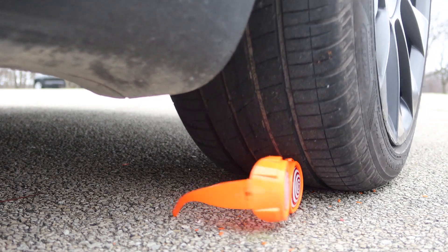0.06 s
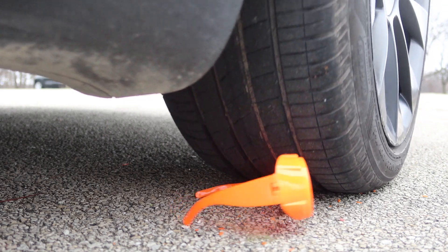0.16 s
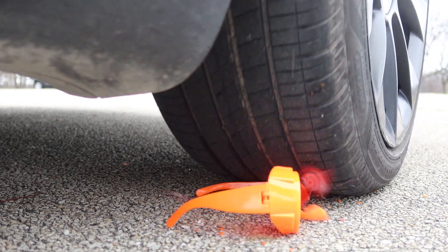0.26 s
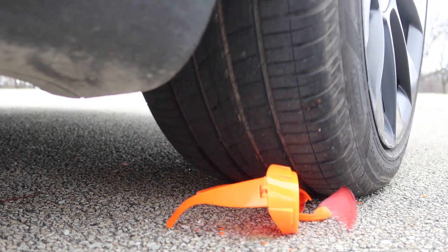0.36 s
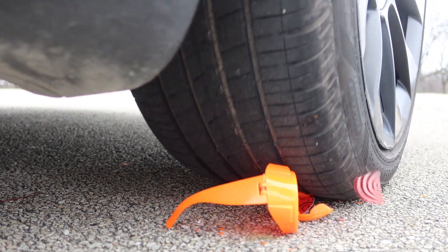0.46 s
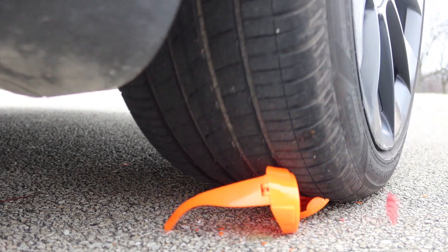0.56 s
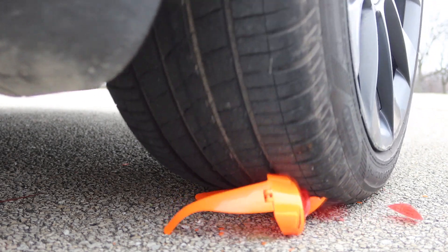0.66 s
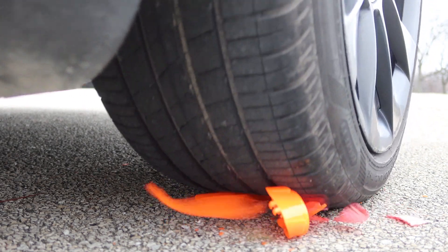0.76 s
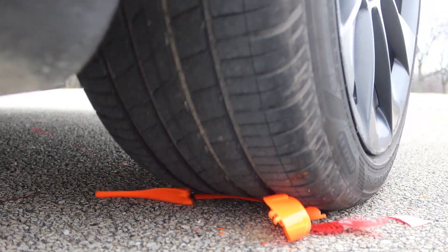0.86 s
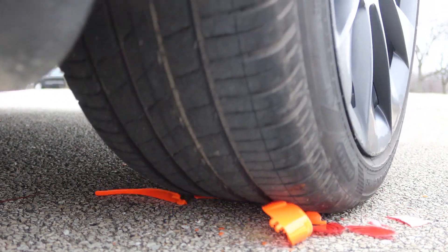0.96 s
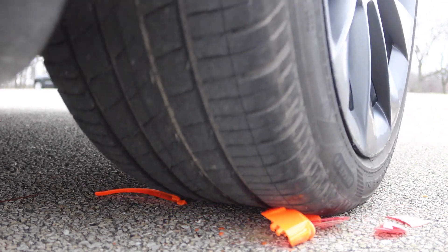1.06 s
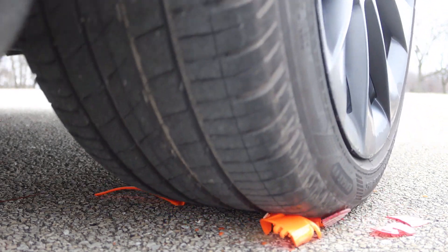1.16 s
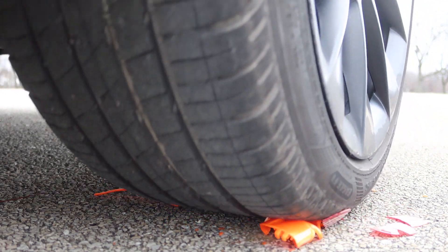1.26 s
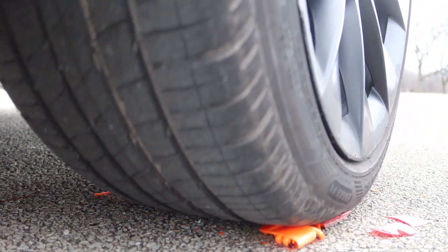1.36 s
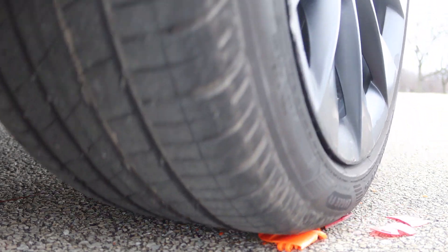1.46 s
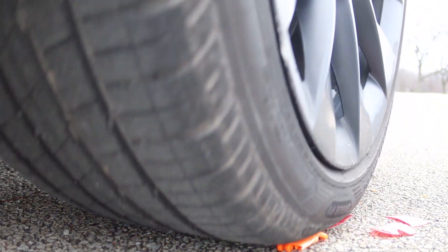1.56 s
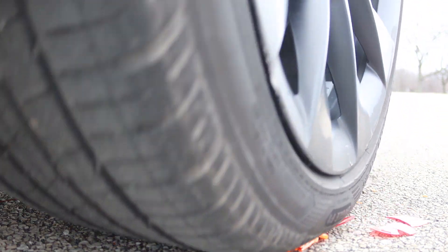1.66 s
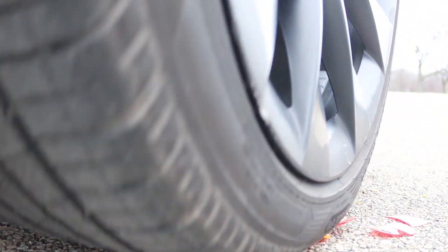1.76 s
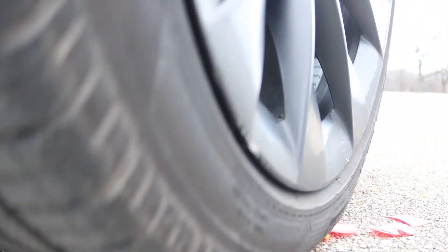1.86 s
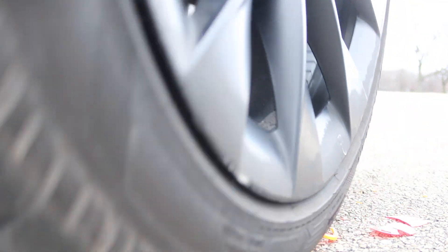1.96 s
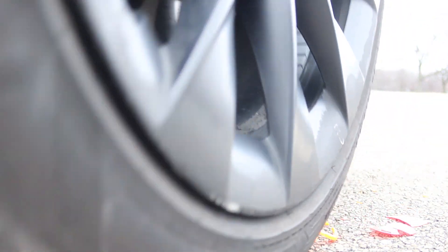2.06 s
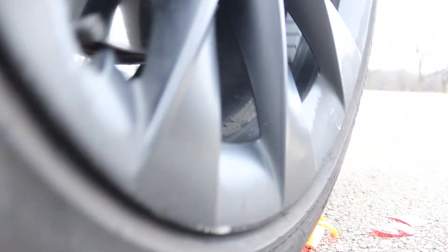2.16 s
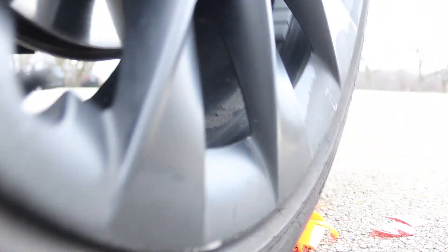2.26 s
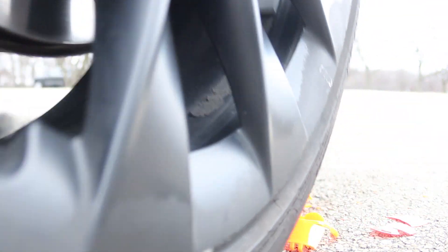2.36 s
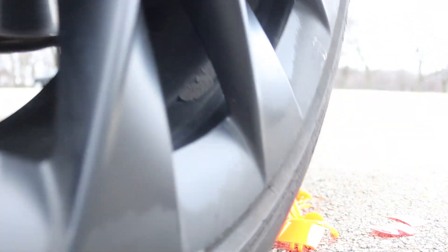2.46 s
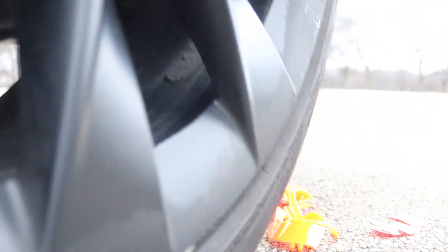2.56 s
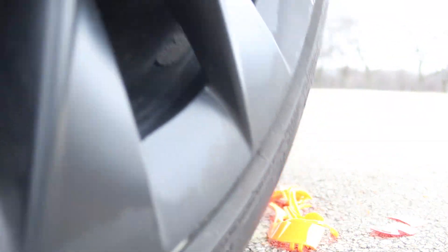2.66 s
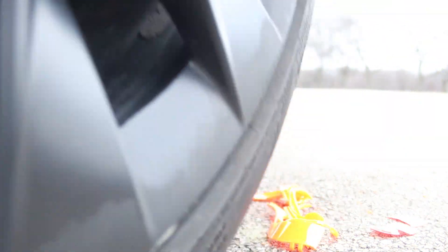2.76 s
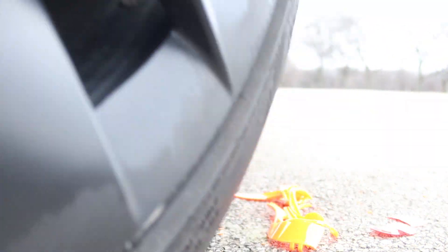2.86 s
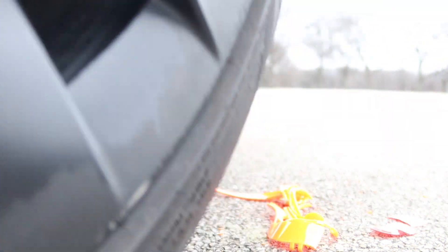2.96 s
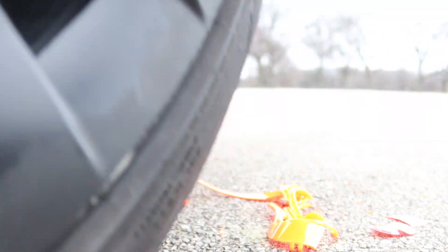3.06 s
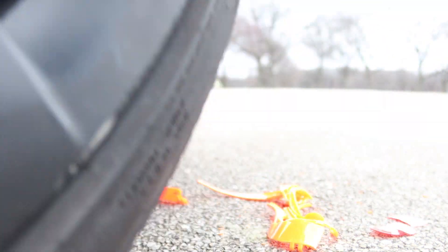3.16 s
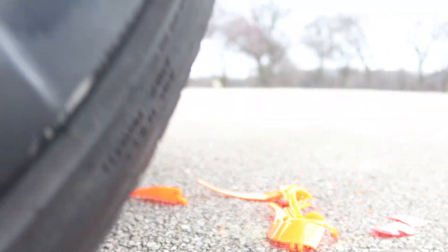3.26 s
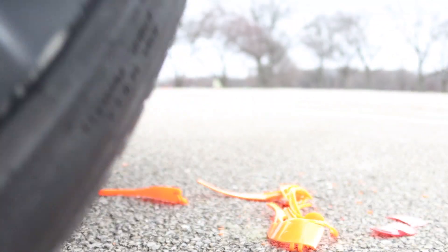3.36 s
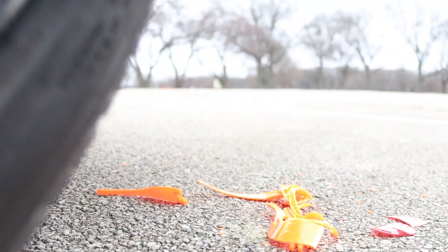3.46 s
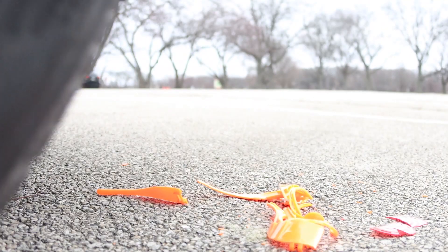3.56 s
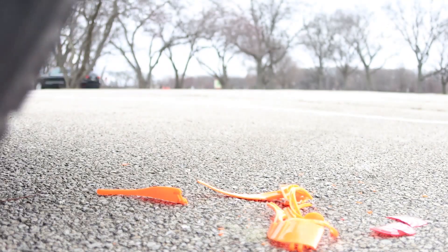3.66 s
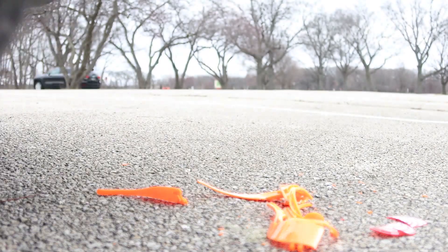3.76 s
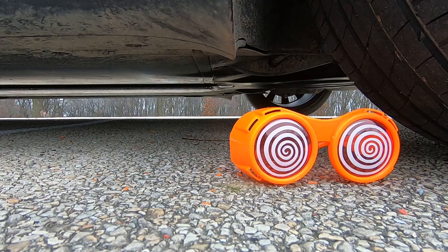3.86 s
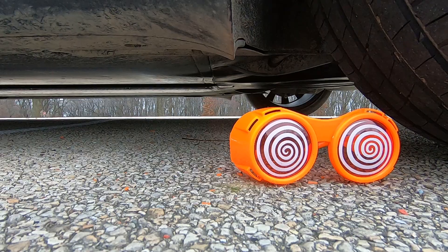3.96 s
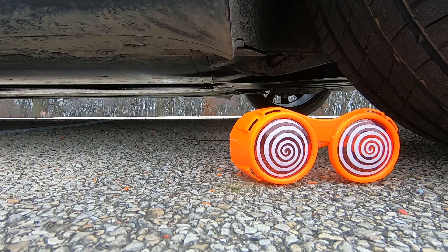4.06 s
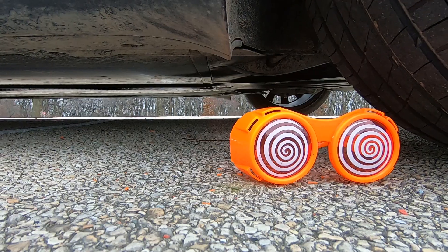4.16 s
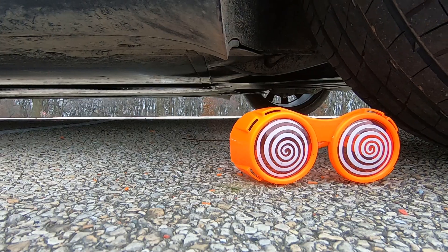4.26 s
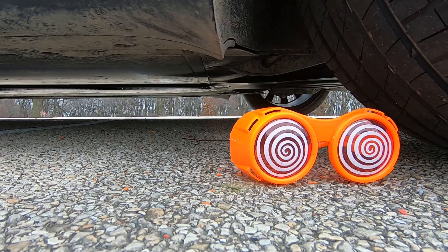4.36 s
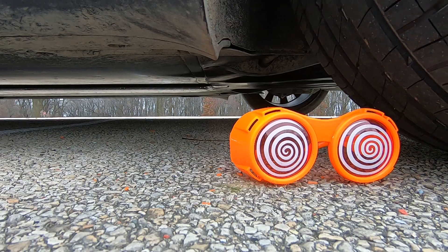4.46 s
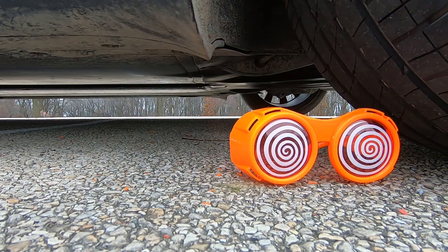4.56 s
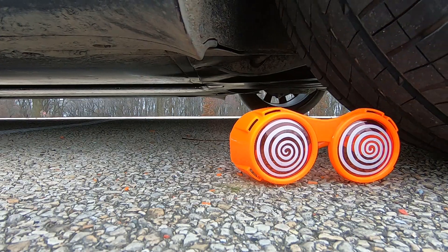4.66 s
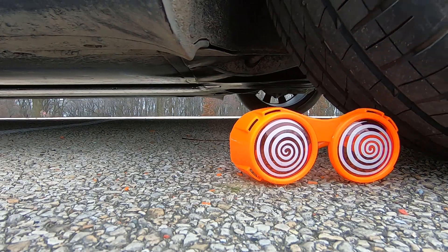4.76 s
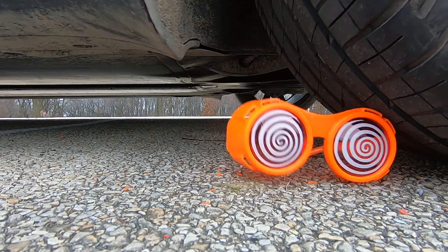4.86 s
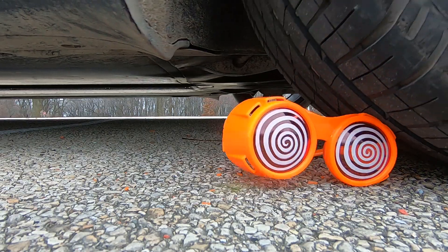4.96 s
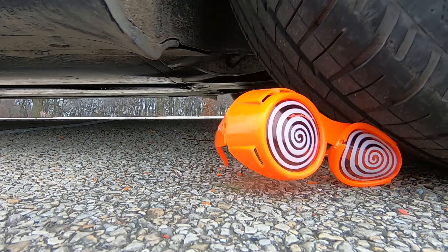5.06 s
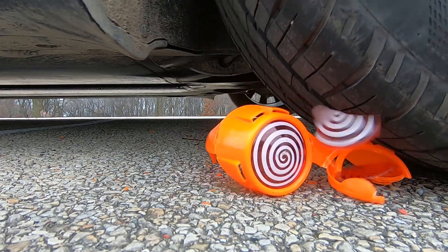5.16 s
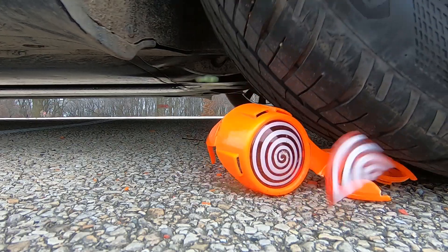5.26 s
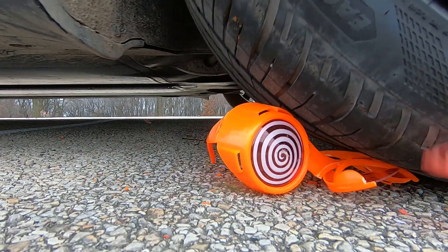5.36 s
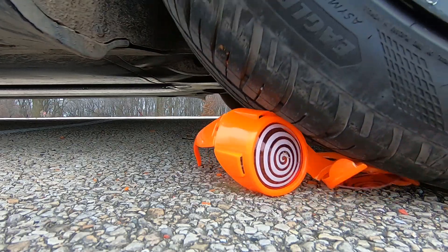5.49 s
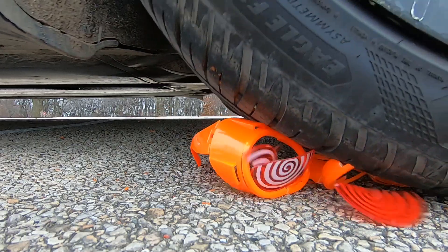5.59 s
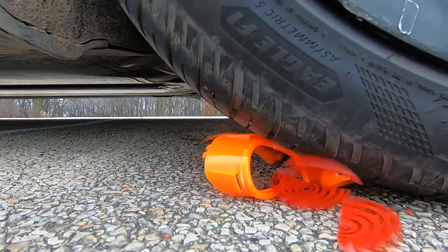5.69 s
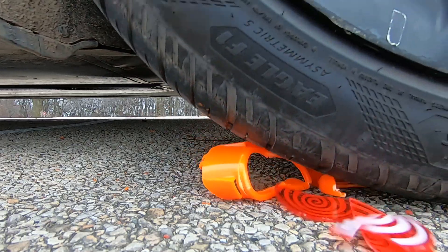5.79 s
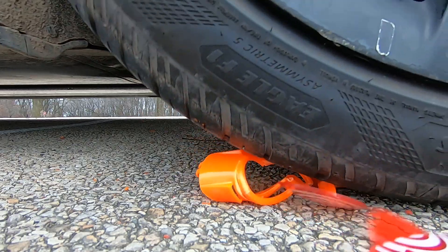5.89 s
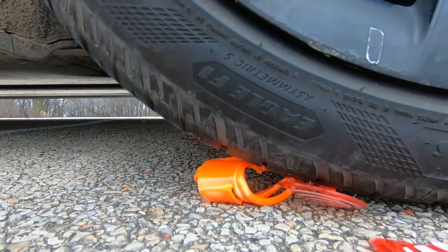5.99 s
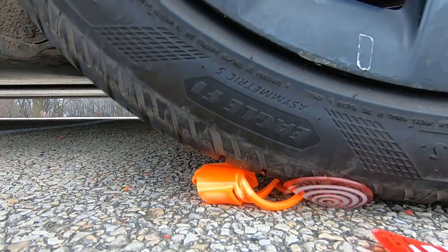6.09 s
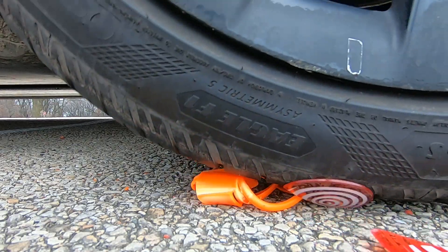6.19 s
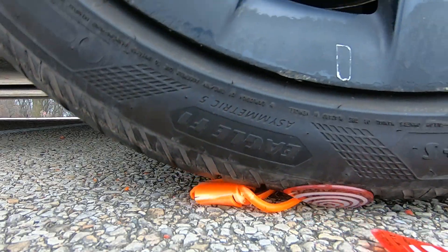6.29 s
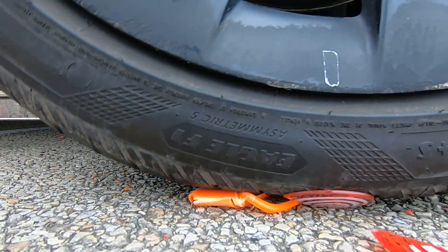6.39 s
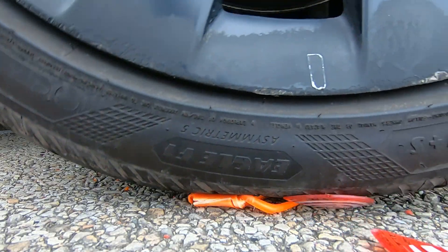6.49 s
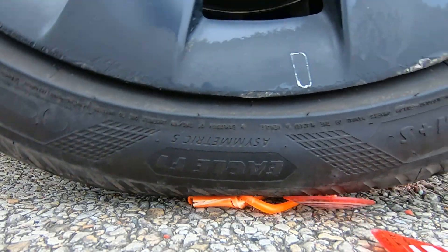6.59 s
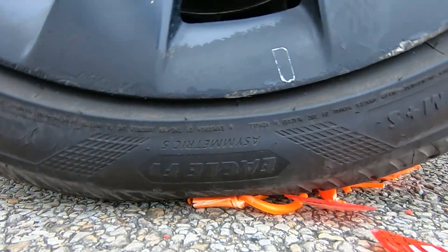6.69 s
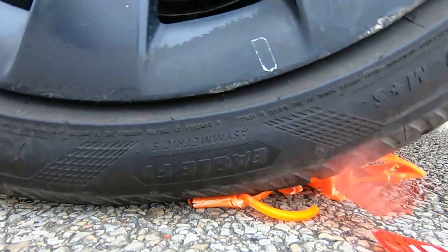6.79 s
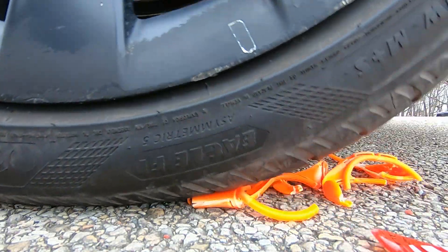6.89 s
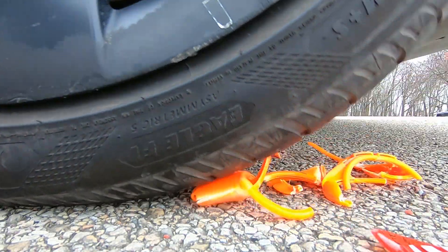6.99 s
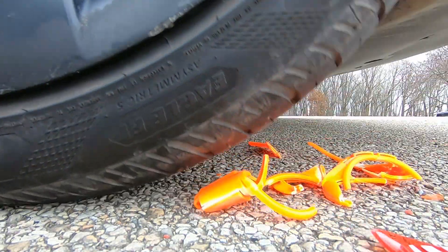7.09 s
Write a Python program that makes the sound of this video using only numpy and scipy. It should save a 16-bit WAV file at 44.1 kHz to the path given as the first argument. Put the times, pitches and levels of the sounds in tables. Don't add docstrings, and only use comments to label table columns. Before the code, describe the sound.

A slow car tyre crushes hard plastic goggles on asphalt with sharp brittle cracks, then the same crush repeats duller and lower from the ground.

```python
import sys
import numpy as np
from scipy import signal
from scipy.fft import rfft, irfft, next_fast_len
from scipy.io import wavfile
from scipy.ndimage import uniform_filter1d

SR = 44100
rng = np.random.default_rng(int(sys.argv[2]) if len(sys.argv) > 2 else 0)


def put_to_file(sound):
    columns = np.atleast_2d(sound).T
    safe = np.clip(columns, -1, 1)
    whole_steps = np.round(safe * 32767)
    wavfile.write(sys.argv[1], SR, whole_steps.astype(np.int16))


def invert_db(x):
    u = np.asarray(x, float) / 20
    return 10 ** u


N = 314433

CUT_S, REPLAY_S = 3.862, 4.8468
LOADED_S = 1.36

# [start_s, shard_db, pitch_hz, treble_db]
FRAME_BREAKS = [(0.164, -4.5, 3300, -19.5), (0.1683, 5, 3400, -4), (0.173, 2, 3220, -4.5),
                (0.199, 1, 3150, -14.5), (0.2192, 1.5, 3200, -6), (0.242, -0.5, 3300, -13),
                (0.2619, 5, 3660, -4.5), (0.2711, -8.5, 1466, -8), (0.2783, -10, 7550, -12),
                (0.3055, -13.5, 3430, -13), (0.3215, -3.5, 4236, -4), (0.334, -5.5, 3600, -4),
                (0.354, 8.5, 3460, 0.5), (0.4664, -5.5, 7900, -3.5), (0.4688, -4.5, 5500, -11.5),
                (0.473, 0, 3200, -6), (0.4805, 1, 5630, -9.5), (0.4928, -7.5, 3300, -1),
                (0.5517, -8, 2940, -15), (0.6127, 7, 3540, -17), (0.6396, -1, 3300, -18.5),
                (0.6525, -2.5, 2400, -19.5), (0.6692, 4.5, 3200, -10.5), (0.6758, -2.5, 3240, -3.5),
                (0.6952, 0.5, 3400, -7.5)]
# [start_s, shard_db, pitch_hz, treble_db]
CUP_BREAKS = [(0.7273, -6, 3500, -20), (0.7337, -20, 1970, -9), (0.7513, -6, 3430, -27),
              (0.773, -9, 3500, -11.5), (0.7789, 1.5, 3020, -5), (0.817, -23, 4040, -23),
              (0.8481, -7.5, 4060, -14.5), (0.8666, -26, 4140, -3), (0.8752, 0.5, 3230, -14),
              (0.9012, -19, 5000, -13.5), (0.9263, -19.5, 2510, -13), (0.9747, 0.5, 3140, 5),
              (0.9808, -1.5, 3200, -2.5), (1.0424, -13, 3000, -15.5), (1.082, -19, 7060, -22.5),
              (1.1132, -4.5, 7040, -17.5), (1.1194, 4, 3604, -11.5), (1.1252, 0, 1920, 6.5),
              (1.1495, -9.5, 4400, -12), (1.2293, -9.5, 3020, -8), (1.2409, -5, 4570, -4),
              (1.254, 4, 6520, -17.5), (1.256, -5, 2700, -18.5)]
# [start_s, shard_db, pitch_hz, treble_db]
TREAD_BREAKS = [(1.4447, -12, 1500, -12), (1.4516, 1.5, 4160, -3), (1.4635, -44, 4300, -10.5),
                (1.5074, -10, 1630, -13), (1.5246, -21, 4300, -12), (1.7752, -49, 3310, -16.5),
                (1.6045, -7, 1560, -7), (1.6094, 6, 3680, 3), (1.6694, -5.5, 3560, -43),
                (1.685, -9.5, 1740, -15.5), (1.7168, 1, 3820, -15), (1.729, -51, 4530, -13),
                (1.7446, -15.5, 3140, -21.5), (1.7808, -4.5, 3100, -23), (1.7883, 0.5, 2800, -15),
                (1.8138, -11, 2150, -26), (1.8228, -13, 4430, -23), (1.8805, 2, 3050, -5.5),
                (1.9083, -14, 3020, -37), (1.9455, -0.5, 3650, -7), (1.9896, -14.5, 4510, -11.5),
                (2.0, -19, 6230, -15.5), (2.0253, -9.5, 6820, 8), (2.112, -6.5, 3080, -35.5),
                (2.189, -18, 4940, -38), (2.2, -9, 3200, -37), (2.2107, -3, 3800, -20),
                (2.2291, -10, 3000, -50), (2.2574, -23.5, 3630, -60), (2.2864, -8, 3190, -44)]
# [start_s,
# level_db, pitch_hz]
FREED_SHARDS = [(0.1984, 2.5, 4870), (0.2778, -3.5, 7230), (0.3217, -3, 8190), (0.3354, -1, 7850),
                (0.3531, 0.5, 5680), (0.4673, 3.5, 8470), (0.4744, 0.5, 5720), (0.4804, -6, 5650),
                (0.4928, 1, 8680), (0.5571, -13, 6630), (0.6125, 4.5, 6740), (0.6514, 0, 6710),
                (0.6684, -4, 6730), (0.6754, -3, 7090), (0.6948, -3.5, 7570), (0.7334, -8, 8750),
                (0.7781, -9, 7040), (0.8669, -4, 8980), (0.9757, -4.5, 6910), (0.9817, -1, 6790),
                (1.1488, 0, 8170), (1.2286, -2, 6820), (1.2406, -2.5, 7080), (1.2545, 3, 6370),
                (1.4516, -2.5, 9190), (1.5244, -1.5, 8490), (1.6097, 3.5, 8790), (1.6851, -13, 7790),
                (1.717, -2.5, 5140), (1.7284, -16, 9340), (1.7878, -8, 5240), (1.8801, -3.5, 9270),
                (2.1884, -19, 4950), (2.2114, 1.5, 5640),
                (0.179, -5.5, 3400), (0.2724, -14, 2420), (0.3631, -1, 2060), (0.6689, -0.5, 3400),
              (0.696, -5, 3400), (0.846, -11, 2940), (0.9263, -13, 3120), (0.9732, -8, 3200),
              (1.491, -25, 1650), (1.552, -5, 1150), (1.6556, -11, 2710), (1.699, -10, 3060),
              (1.9677, -9, 3200), (2.176, -11.5, 3140)]
# [start_s, level_db]
CRUNCH_LEVEL = [(0.14, -47.5), (.2, -33.5), (.27, -35.5), (.3, -46.5), (.37, -25), (.41, -50), (.45, -65.5),
                (.6, -43), (.63, -28), (.72, -47), (.83, -58.5), (0.881, -29.5), (.97, -34), (1.0, -48),
                (1.04, -34), (1.13, -48), (1.4, -48.5), (1.6, -58.5), (1.8, -33.5), (1.87, -46), (2.0, -34),
                (2.151, -51.5), (2.24, -38), (2.361, -66)]
# [start_s, length_s, near_db, ground_db]
SCRAPES = [
    (0.072, .004, -36, -52),
    (0.079, 0.0042, -20.5, -38),
    (0.093, 0.00092, -16.5, -40),
    (0.0971, 0.0031, -16, -36),
    (0.1038, 0.0022, -12.5, -37),
    (0.1182, 0.0055, -20, -38.5),
    (0.126, 0.0048, -28.5, -45),
]
# [pitch_hz, width_hz, level_db]
FRAME_MODES = [(1500, 190, -3), (1820, 120, -2), (3200, 300, 7.5), (3400, 140, 4.5), (4100, 730, 3),
               (7440, 1200, -9)]
# [start_s, near_db, ground_db, ground_pitch_hz]
THUDS = [(0.2618, -6.5, -8, 236.4), (0.2783, -35.5, -13.5, 193), (0.3226, -26, -13.5, 292),
         (0.354, -14.5, -13.5, 230.5), (0.4659, -23, -24, 324), (0.5517, -31, -38, 397),
         (0.6121, -10, -20.5, 354), (0.6972, -37.5, -18, 303), (0.7341, 4.5, -0.5, 570),
         (0.7774, -12, -8.5, 224.4), (0.8749, -7.5, -9.5, 298.3), (0.974, -4.5, -11.5, 297),
         (1.0424, -9, -17, 554), (1.1216, -3.5, -16.5, 412), (1.1253, -19, -4.5, 609),
         (1.257, -17, -21.5, 139), (1.6046, -4.5, -37, 340.7), (1.6091, -2.5, -8.5, 345),
         (1.685, -5, -21.5, 363), (1.7879, 2, -12.5, 390), (1.8815, -13.5, -16, 358),
         (1.9464, -6.5, -12.5, 335), (2.187, -18.5, -17.5, 343)]
# [pitch_hz, level_db, t60_s]
TYRE_MODES = [(109, -8, 0.06), (141, -14, 0.1), (196, -9, 0.27), (296.8, -13, 0.05), (375, -10, 0.24)]
# [start_s, level_db]
PINGS = [
    (0.458, -24.5),
    (0.587, -34.5),
    (.626, -26),
    (.878, -22),
    (1.984, -34),
    (1.991, -29),
    (1.996, -33.5),
    (2.005, -34.5),
    (2.026, -14.5),
]
# [pitch_hz, level_db, t60_s]
RIM_MODES = [(2400, -17, .2), (2500, -12, 0.24), (3773, -5, 0.13), (4356, -2, 0.13), (4660, -1, .16),
             (5060, -9, 0.11), (5640, -9, .11), (6100, -10, 0.09), (6800, -7, .1), (7770, -10, .07),
             (8640, -12, 0.075), (9280, -15, 0.06), (10400, -18, .05), (12500, -18, .04)]
# [start_s, loudest_hz, level_db, length_s]
LENS_SKIDS = [(0.358, 5750, -16, 0.014), (0.39, 5580, -29.5, 0.021), (0.412, 4960, -32, 0.018),
              (0.626, 4400, -15, 0.011), (.699, 840, -21.5, 0.012), (0.831, 5400, -25.5, 0.036),
              (0.885, 4650, -21, 0.031), (.906, 4650, -15, 0.016), (.919, 7850, -20.5, 0.013),
              (.934, 4650, -22, 0.066), (0.941, 1580, -28.5, .045), (.962, 5360, -21.5, 0.016),
              (1.018, 7200, -16.5, 0.014), (1.031, 5310, -18, 0.042), (1.057, 4630, -17.5, .03),
              (1.065, 7200, -22, 0.013), (1.084, 7200, -25, 0.022), (1.112, 8040, -16.5, 0.019),
              (1.19, 5330, -28.5, 0.03), (1.478, 7200, -38.5, 0.073), (1.564, 7200, -39.5, 0.013),
              (1.612, 3900, -23.5, 0.024), (2.035, 1035, -36, 0.15), (1.146, 1886, -42.5, 0.13),
              (1.258, 1903, -41.5, 0.098), (2.232, 3300, -15, 0.013), (2.241, 2630, -15.5, 0.0081),
              (2.257, 3840, -31, 0.017), (2.286, 3655, -15, 0.011), (2.311, 3670, -37, .03),
              (2.316, 2920, -24, 0.011)]
# [pitch_hz, width_hz, level_db]
LENS_MODES = [(4650, 90, -14), (5330, 90, -14), (6200, 120, -16.5), (7200, 100, -13), (7900, 110, -16.5),
              (8800, 120, -17.5), (9620, 120, -12.5), (11500, 200, -19.5), (14000, 250, -18.5)]
# [start_s, ring_db, struck_hz, tick_db, tick_hz]
TUMBLES = [(2.5004, -20, 4657, -14, 3200), (2.5097, -19.5, 3801, 6, 4400), (2.519, -22.5, 6142, -7, 6100),
           (2.552, -60, 11420, -21, 11420), (2.675, -66.5, 4366, -47, 9000),
           (2.699, -31.5, 12400, -18, 3450), (2.797, -36, 3801, -21.5, 3060), (2.807, -28, 4657, -36, 4570),
           (2.829, -50, 2342, -24, 2600), (2.843, -35.5, 6142, -27, 3500), (2.906, -48, 4657, -31, 3200),
           (2.943, -30, 4657, -10, 3300), (2.952, -25, 4366, -15, 3400), (3.0205, -46, 4366, -43, 4400),
           (3.029, -27, 4657, -21, 4200), (3.056, -32, 4366, -35, 4460), (3.062, -33, 4657, -34, 3600),
           (3.08, -56, 4366, -32, 4030), (3.199, -59, 4366, -33, 2990), (3.588, -61, 4366, -30, 4470)]
# [pitch_hz, level_db, t60_s]
LOOSE_MODES = [(2342, -19.5, 0.23), (2496, -18, 0.17), (3801, -4.5, 0.078), (4366, -0.5, 0.15),
               (4657, -3.5, 0.082), (5604, -22, 0.093), (6142, -13.5, 0.086), (6790, -14.5, 0.1),
               (7850, -18, 0.084), (9020, -15.5, 0.073), (10330, -22, 0.066), (11420, -26, .04),
               (12400, -20, 0.053), (14400, -20, .035)]
# [start_s, level_db]
WHEEL_SHADE = [(.16, -17), (.44, -5.5), (.48, -21), (.7, -17.5), (1.0, -17), (1.1, -23.5), (1.26, -13.5),
               (1.45, -26.5), (1.7, -19), (1.95, -16), (2.02, -20.5), (2.1, -12.5), (2.3, -14.5)]
# [pitch_hz, level_db]
GROUND_COLOUR = [(1000, 16.5), (1700, 13), (2200, 6.5), (2800, 18), (3500, -7.5), (4000, 1), (4800, -9),
                 (5700, -6.5), (6900, -11), (7600, -4.5), (10000, -15), (13000, -24), (16000, -59)]
# [pitch_hz, right_lag_rad, left_minus_right_db]
PORTS = [(250, 0, 0), (520, .3, -5), (700, .9, -4), (1030, 2.0, 0), (1400, 2.7, 5), (1640, 2.9, 12),
         (1800, .9, 9), (2050, 2.1, -1), (2580, 3.3, 1), (3600, 4.1, 5), (4300, 3.4, 0), (5500, 5.4, 11),
         (7600, 4.3, -9), (9300, 5.4, 8)]
# [start_s, rumble_db, roar_db, grit_hiss_db]
BED_NEAR = [
    (0.0, -30, -31.5, -53),
    (0.35, -46, -41.5, -43),
    (3.4, -37.5, -43.5, -54),
    (3.86, -33, -38.5, -52),
]
# [start_s, rumble_db, roar_db, grit_hiss_db]
BED_GROUND = [
    (3.87, -32, -36.5, -69),
    (6.55, -38.5, -36, -62),
    (7.13, -30.5, -31, -58),
]
# [pitch_hz, density_db_per_hz]
AIR_NEAR = [(15, -20), (25, 1.5), (87, -4), (223, -13.5), (309, -20), (560, -14.5), (962, -14),
            (1790, -27.5), (4140, -29), (7500, -43.5), (16000, -54.5)]
# [pitch_hz, density_db_per_hz]
AIR_GROUND = [(25, -19.5), (60, -3), (150, -10.5), (230, -6), (400, -12.5), (600, -14.5), (1000, -14.5),
              (1400, -21.5), (1750, -30), (2000, -47), (2400, -52.5), (3000, -46), (3600, -63),
              (12000, -95)]
# [pitch_hz, width_hz, over_rumble_db]
HUM_NEAR = [(69.5, 15, -3.5), (982, 54, -12), (3300, 410, -19.5), (4080, 160, -23.5), (9480, 70, -31)]
# [pitch_hz, width_hz, over_rumble_db]
HUM_GROUND = [(65.4, 17, -2), (137.3, 19, -1), (585.7, 9, -14)]


def breaks():
    snap_lag_s = 0.00055
    pinned_ring = 0.73
    snaps = []
    for rows, ring_time in [(FRAME_BREAKS + CUP_BREAKS, 1), (TREAD_BREAKS, pinned_ring)]:
        for s, db, hz, treble_db in rows:
            snaps.append((s + snap_lag_s, max(db, treble_db), snap(db, hz, treble_db, ring_time)))
    for s, db, hz in FREED_SHARDS:
        snaps.append((s, db, shard(db - 8.5, hz)))
    return snaps


def snap(db, hz, treble_db, ring_time):
    splinters, splinter_db, splinter_t60_s = 7, -14.5, .022
    tick_db, tick_t60_s, spike = -6.5, 0.0064, 14
    t = np.arange(3600) / SR / ring_time
    shard_noise, fizz_noise, tick_noise = rng.standard_normal((3, len(t)))
    pitch_luck, level_luck = rng.random((2, splinters, 1))
    rise = 1 - np.exp(-t / 0.000083)
    ring_decay = invert_db(-60 * t / 0.025) + invert_db(-33.5 - 60 * t / 0.12)
    ring = evened(resonate(shard_noise, hz, 0.14 * hz)) * ring_decay
    crack_decay = invert_db(-60 * t / 0.0066) + invert_db(-14.5 - 60 * t / 0.071)
    crack = evened(resonate(shard_noise, 0.92 * hz, 0.41 * hz)) * crack_decay
    fizz_decay = invert_db(-60 * t / 0.014) + invert_db(-19.5 - 60 * t / 0.076)
    fizz = evened(resonate(fizz_noise, 9200, 7900)) * fizz_decay
    splinter_hz = 0.51 * hz * 2.6 ** pitch_luck
    bits_level = invert_db(splinter_db - 27.7 * level_luck - 4 * pitch_luck - 60 * t / splinter_t60_s)
    bits = (np.sin(2 * np.pi * splinter_hz * t * ring_time) * bits_level).sum(0)
    edge = tick_noise + spike * (np.arange(len(t)) == 0)
    tick = invert_db(max(db - 19.5, treble_db) + tick_db - 60 * t / tick_t60_s) * band(edge, 1500, 12500)
    body = invert_db(db) * (0.23 * ring + 0.5 * crack + bits)
    return tick + rise * (body + invert_db(treble_db - 5.0) * fizz)


def shard(db, hz):
    t60_s, relative_width = .02, .07
    t = np.arange(1200) / SR
    ring = evened(resonate(rng.standard_normal(len(t)), hz, relative_width * hz))
    return invert_db(db - 60 * t / t60_s) * ring * (1 - np.exp(-t / .0003))


def crunch(delay):
    s, db = np.transpose(CRUNCH_LEVEL)
    sizes = invert_db(3.5 * np.minimum(rng.exponential(1, N), 4))
    clicks = (rng.random(N) < 900 / SR) * sizes
    puffs = signal.lfilter([1], [1, -.99], clicks) * rng.standard_normal(N)
    sound = evened(.9 * evened(frame_resonance(puffs)) + evened(band(puffs, 2200, 8000)))
    return sound * invert_db(np.interp(np.arange(N) / SR - delay, s, db, -120, -120))


def scrape(length, db):
    grit = rng.standard_normal(3000) * invert_db(2.9 * rng.standard_normal(3000))
    u = np.arange(len(grit)) / SR / np.clip(length, .001, .009)
    stroke = u * np.exp(1 - u)
    return invert_db(db) * frame_resonance(evened(grit) * stroke)


def frame_resonance(x):
    return sum(invert_db(db) * resonate(x, hz, w) * np.sqrt(SR / (4 * w)) for hz, w, db in FRAME_MODES)


def thump(db, hz):
    t = np.arange(2600) / SR
    push = np.sin(2 * np.pi * hz * rng.uniform(0.92, 1.2) * t)
    push = push * invert_db(-60 * hz * t / 7) * (1 - np.exp(-t / 0.0002))
    puff = evened(resonate(rng.standard_normal(len(t)), 1.1 * hz, 1.2 * hz)) * invert_db(-60 * hz * t / 14)
    return invert_db(db) * (1.204 * push + 0.42 * puff)


def knocks(delay, extra_db, hz):
    knock_db, slope = -20.5, 0.13
    out = np.zeros(N)
    for s, db, _, treble_db in FRAME_BREAKS + CUP_BREAKS + TREAD_BREAKS:
        add(out, s + delay, thump(knock_db + extra_db + slope * max(db, treble_db), hz))
    return band(out, 70, 6000)


def tyre(thumps, ring_db, delay):
    thumps = band(thumps, 70, 6000)
    loaded = np.arange(N) / SR > LOADED_S + delay
    drive = thumps * invert_db(ring_db - 15 * loaded)
    response = rings(TYRE_MODES, np.arange(12000) / SR, split=0.081)
    ring = signal.oaconvolve(drive, response)[:N]
    return thumps + ring * flutter(N, count=500, depth=.3)


def rim_pings(delay, extra_db):
    out, t = np.zeros(N), np.arange(8000) / SR
    for s, db in PINGS:
        ring = rings(RIM_MODES, t, jitter_db=3.5, split=.012)
        add(out, s + delay, invert_db(db + extra_db) * np.minimum(t / .0006, 1) * ring)
    return out


def lens_skids(delay, extra_db):
    out, t = np.zeros(N), np.arange(6000) / SR
    body = sum(invert_db(db) * evened(resonate(rng.standard_normal(SR), hz, w)) for hz, w, db in LENS_MODES)
    for s, hz, db, length in LENS_SKIDS:
        squeak = evened(resonate(rng.standard_normal(6000), hz, .012 * hz))
        squeak = squeak + (hz > 4200) * body[rng.integers(SR - 6000):][:6000]
        u = t / length
        stroke = (1 - np.exp(-u / 0.08)) * np.exp(-2.0 * u ** 0.9)
        level = invert_db(db + extra_db * np.sqrt(min(hz / 5000, 1)))
        add(out, s + delay, level * squeak * stroke)
    return out


def tumbles():
    struck_db, tick_treble_db = 8.5, -17
    out, t = np.zeros(N), np.arange(6000) / SR
    for s, db, struck_hz, tick_db, tick_hz in TUMBLES:
        modes = []
        for hz, mode_db, t60 in LOOSE_MODES:
            nearness = np.exp(-(np.log(hz / struck_hz) / .04) ** 2)
            modes.append((hz, mode_db + struck_db * nearness, t60))
        ring = np.minimum(t / .0008, 1) * rings(modes, t, jitter_db=3, split=.012)
        add(out, s, invert_db(db) * ring * flutter(len(t), count=40, depth=.18))
        tick = snap(tick_db, tick_hz, tick_db + tick_treble_db, 0.83)
        add(out, s, band(tick, 2600, 15000))
    return out


def bed(rows, air, hum):
    frames, hz = N // 256 + 5, np.fft.rfftfreq(1024, 1 / SR)
    real, imaginary, patches = rng.standard_normal((frames, 513, 3)).T
    patches = evened(uniform_filter1d(uniform_filter1d(patches, 8, 0), 10, 1))
    spectrum = (real + 1j * imaginary) * invert_db(read(air, hz)[:, None] + 1.5 * patches)
    s, *levels_db = np.transpose(rows)
    t, out = np.arange(N) / SR, 0
    layer = np.digitize(hz, [250, 2100])
    for k, db in enumerate(levels_db):
        part = signal.istft(spectrum * (layer == k)[:, None], nperseg=1024, noverlap=768)[1][:N]
        out = out + evened(part) * invert_db(np.interp(t, s, db))
    lines = sum(invert_db(db) * evened(resonate(rng.standard_normal(N), f, w)) for f, w, db in hum)
    return out + lines * invert_db(np.interp(t, s, levels_db[0]))


def ducked(background, loud, over_db, back_db_per_s):
    power_db = 10 * np.log10(abs(uniform_filter1d(loud ** 2, 600)) + 1e-12)
    fall = np.arange(N) * back_db_per_s / SR
    held_db = np.maximum.accumulate(power_db + fall) - fall
    excess_db = np.maximum(held_db - over_db, 0)
    return background / invert_db(uniform_filter1d(excess_db, 500))


def evened(x):
    return x / np.sqrt(np.mean(x ** 2) + 1e-20)


def read(points, hz, column=1):
    table = np.transpose(points)
    return np.interp(np.log(hz + 1), np.log(table[0] + 1), table[column])


def add(mix, s, sound):
    part = mix[round(s * SR):][:len(sound)]
    part += sound[:len(part)]


def resonate(x, hz, width):
    b, a = signal.iirpeak(hz, hz / (1.55 * width), SR)
    return signal.lfilter(b, a, signal.lfilter(b, a, x))


def band(x, lo_hz, hi_hz):
    sos = signal.butter(2, [lo_hz, min(hi_hz, SR / 2.1)], "band", fs=SR, output="sos")
    return signal.sosfilt(sos, x)


def rings(modes, t, jitter_db=0, split=0):
    luck = rng.standard_normal((len(modes), 2))
    out = 0
    for (hz, db, t60), (level_luck, split_luck) in zip(modes, luck):
        decay = invert_db(db + jitter_db * level_luck - 60 * t / t60)
        beating = 1 + 0.45 * np.cos(2 * np.pi * split * split_luck * hz * t)
        out = out + decay * np.sin(2 * np.pi * hz * t) * beating
    return out


def flutter(size, count, depth):
    drift = uniform_filter1d(uniform_filter1d(rng.standard_normal(size), count), count)
    return 1 + depth * evened(drift)


def near_camera(snaps):
    free_thud_hz, loaded_thud_hz = 660, 1124
    sharp = rim_pings(0, 0) + lens_skids(0, 0) + crunch(0) + tumbles()
    thumps = np.zeros(N)
    for s, _, sound in snaps:
        add(sharp, s, sound)
    for s, db, *_ in THUDS:
        add(thumps, s, thump(db, free_thud_hz if s < LOADED_S else loaded_thud_hz))
    for s, length, db, _ in SCRAPES:
        add(sharp, s, scrape(length, db))
    loud = sharp + tyre(thumps, -42.5, 0) + knocks(0, 0, 600)
    out = loud + ducked(bed(BED_NEAR, AIR_NEAR, HUM_NEAR), loud, -8.5, 77)
    return np.array([out, out])


def ground_camera(snaps):
    top_db, knock_db = -5.5, -6
    sharp = rim_pings(REPLAY_S, -12.5) + lens_skids(REPLAY_S, -19) + invert_db(-19.5) * crunch(REPLAY_S)
    thumps = np.zeros(N)
    shade_s, shade_db = np.transpose(WHEEL_SHADE)
    for s, db, sound in snaps:
        gain_db = min(np.interp(s, shade_s, shade_db), top_db - db)
        add(sharp, s + REPLAY_S, invert_db(gain_db) * sound)
    for s, _, db, hz in THUDS:
        add(thumps, s + REPLAY_S, thump(db, hz))
    for s, length, _, db in SCRAPES:
        add(sharp, s + REPLAY_S, scrape(length, db))
    bright = resonate(sharp, 5870, 3200) + 0.58 * band(sharp, 7340, 12600)
    pinned = invert_db(-1.5) * sharp + invert_db(4.5) * bright
    sharp = np.where(np.arange(N) / SR > LOADED_S + REPLAY_S, pinned, sharp)
    thumps = tyre(thumps, -36.5, REPLAY_S) + knocks(REPLAY_S, knock_db, 313)
    background = bed(BED_GROUND, AIR_GROUND, HUM_GROUND)
    low = thumps + ducked(background, thumps + sharp, -33.0, 25.0)
    return two_ports(sharp, low)


def two_ports(sharp, low):
    size = next_fast_len(N + 4096)
    hz = np.fft.rfftfreq(size, 1 / SR)
    z = rfft(sharp, size) * invert_db(read(GROUND_COLOUR, hz)) + rfft(low, size)
    lag, tilt_db = read(PORTS, hz, column=1), read(PORTS, hz, column=2)
    left = z * invert_db(tilt_db / 2)
    right = z * invert_db(-tilt_db / 2) * np.exp(-1j * lag)
    pair = irfft(np.array([left, right]), size)[:, :N]
    scatter = rng.standard_normal((2, 300)) * invert_db(-60 * np.arange(300) / SR / 0.013)
    scatter = band(scatter / np.linalg.norm(scatter[0]), 6180, 14000)
    return pair + invert_db(3.0) * signal.oaconvolve(pair, scatter, axes=1)[:, :N]


def scene():
    splice_s = .001
    over = np.clip((np.arange(N) / SR - CUT_S) / splice_s, 0, 1)
    snaps = breaks()
    return (1 - over) * near_camera(snaps) + over * ground_camera(snaps)


def top_cut(x):
    return signal.sosfilt(signal.butter(12, 16750, fs=SR, output="sos"), x)


def record(dry):
    edge = signal.firwin(255, 16400, window=("kaiser", 8), fs=SR)
    mix = signal.oaconvolve(np.clip(dry, -1, 1), edge[None], "same")
    return top_cut(mix)


dry = scene()
out = record(dry)
put_to_file(out)
```